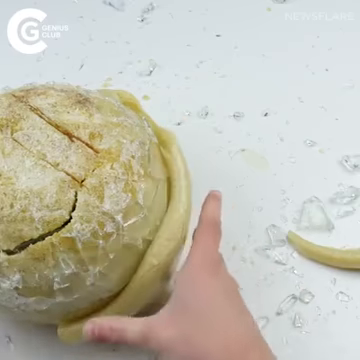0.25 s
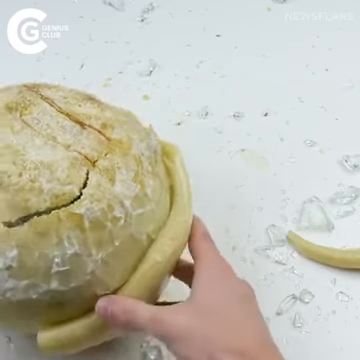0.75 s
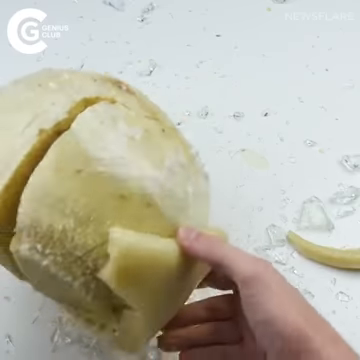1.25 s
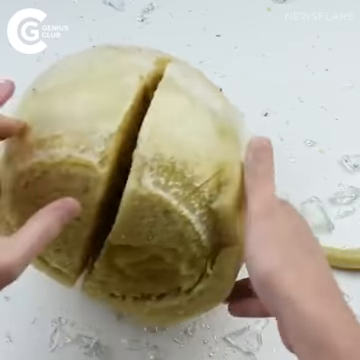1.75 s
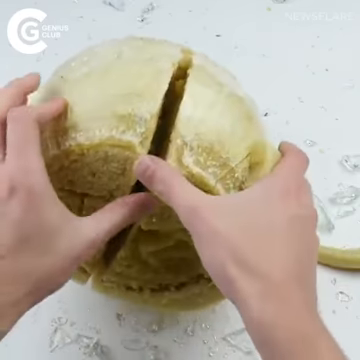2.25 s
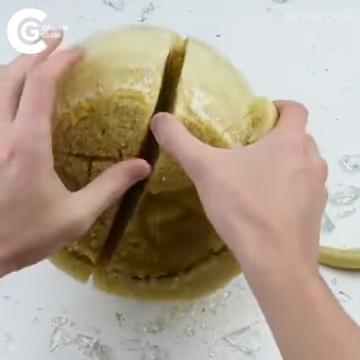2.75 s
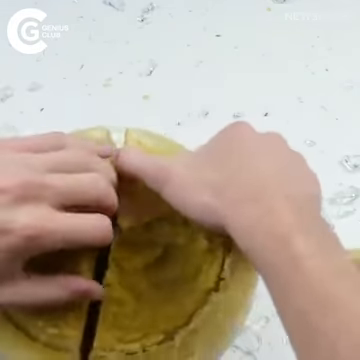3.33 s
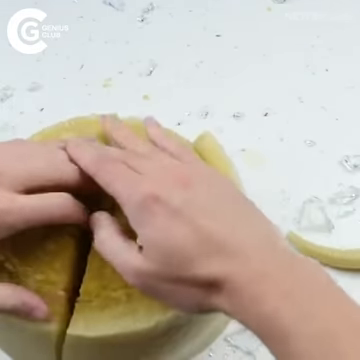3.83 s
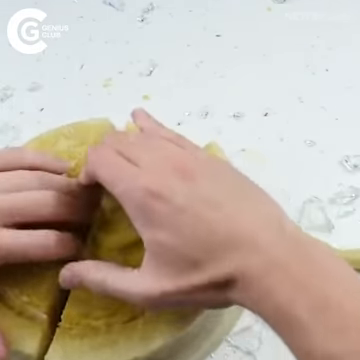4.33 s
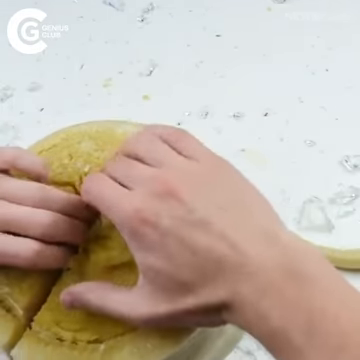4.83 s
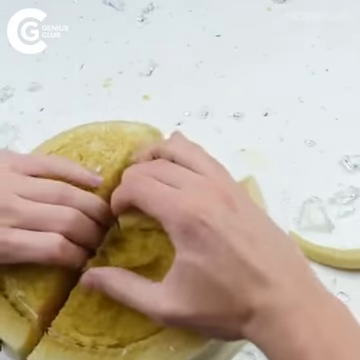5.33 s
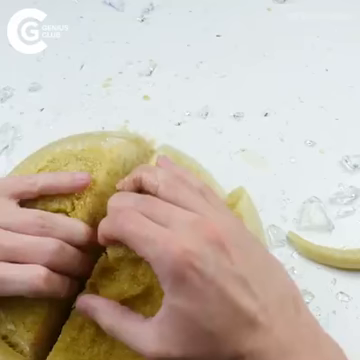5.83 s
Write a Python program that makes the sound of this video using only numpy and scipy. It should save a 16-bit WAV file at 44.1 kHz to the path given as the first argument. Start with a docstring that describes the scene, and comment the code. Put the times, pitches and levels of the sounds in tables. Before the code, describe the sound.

Hollow knocks and a bright glass clink as a hard foam block is turned on a table, then dry crackling, scraping and sharp snaps.

```python
"""A hollow knock and a clink of glass: two hands turn a split block of hardened foam on a glass-strewn table.
It knocks and drags, then they prise at the cut: the crust grinds, crackles and snaps.
Blows and random slips excite resonances of cavity, shell and crust; glass is decaying sines.
The table top booms, noise tails make a small live room, and shaped noise a faint ventilation hum."""
import sys
import numpy as np
from scipy import signal
from scipy.io import wavfile

SR = 44100
rng = np.random.default_rng(int(sys.argv[2]) if len(sys.argv) > 2 else 0)


def bounce(signal):
    """Save signal as a 16-bit WAV file at the path given by the first command-line argument."""
    frames = np.transpose(np.atleast_2d(signal))
    limited = np.clip(frames, -1, 1)
    pcm = np.round(limited * 32767).astype(np.int16)
    wavfile.write(sys.argv[1], SR, pcm)


N = 268128

# Table levels are relative; the playing functions add gains. width_hz is per resonator pass.


def from_db(db):
    """Amplitude ratio of a level in dB."""
    return 10 ** (np.asarray(db) / 20)


def sides_db(left_right_db):
    """Split a left-right level difference evenly over the two sides."""
    return np.array([[left_right_db / 2], [-left_right_db / 2]])


def rms_one(x):
    """Scale to an RMS of 1."""
    return x / np.sqrt(np.mean(x ** 2) + 1e-20)


def unit_energy(x):
    """Scale to a summed energy of 1."""
    return x / np.sqrt(np.sum(x ** 2) + 1e-20)


def at_hz(points, hz):
    """Read a (hz, value) curve on a log frequency axis."""
    curve = np.array(points)
    return np.interp(np.log(hz), np.log(curve[:, 0]), curve[:, 1])


def add(out, start_s, sound):
    """Mix a sound in from start_s on."""
    i = int(np.clip(round(start_s * SR), 0, N - 1))
    out[..., i:i + sound.shape[-1]] += sound[..., :N - i]


def drift(size, rate_hz):
    """A random wander of spread 1."""
    steps = rng.standard_normal(4096)
    return rms_one(np.interp(np.arange(size) / SR * rate_hz, np.arange(len(steps)), steps))


def resonate(x, hz, width_hz):
    """Two-pole resonance with gain 1 on top."""
    r = np.exp(-np.pi * width_hz / SR)
    zeros = np.array([1, 0, -1]) * (1 - r * r) / 2
    poles = [1, -2 * r * np.cos(2 * np.pi * hz / SR), r * r]
    return signal.lfilter(zeros, poles, x + 1e-18)


def resonate_twice(x, hz, width_hz):
    """Two equal resonances in series: rings swell before they decay."""
    return resonate(resonate(x, hz, width_hz), hz, width_hz)


def glide(x, hz, width_hz):
    """A resonance whose centre moves: shift down to 0 Hz, low-pass, shift back."""
    turn = np.exp(2j * np.pi * np.cumsum(hz) / SR)
    r = np.exp(-np.pi * width_hz / SR)
    return 2 * np.real(turn * signal.lfilter([(1 - r) ** 2], [1, -2 * r, r * r], x / turn + 1e-18))


def response(modes, size, order=2):
    """A part's ring after one click; at order 2 each mode swells over a few cycles."""
    out = np.zeros(size)
    for k, (hz, width_hz, db) in enumerate(modes):
        ring = signal.unit_impulse(size)
        for _ in range(order):
            ring = resonate(ring, hz, width_hz)
        out += (-1) ** k * from_db(db) * ring
    return unit_energy(out)


def tilted(modes, db_per_octave, pivot_hz):
    """Modes re-levelled along a slope that is 0 dB at pivot_hz."""
    return [(hz, width_hz, db + db_per_octave * np.log2(hz / pivot_hz)) for hz, width_hz, db in modes]


def grains(shape, per_s, spread_db):
    """Cell walls break at random moments, most of them tiny and a few large."""
    sizes = from_db(spread_db * np.minimum(rng.exponential(1, shape), 4))
    return sizes * rng.choice([-1, 1], shape) * (rng.random(shape) < per_s / SR)


def stereo_grains(size, per_s, spread_db, width):
    """Fractures scattered over the block reach the two sides partly alike and partly different."""
    mid, side = grains((2, size), per_s, spread_db)
    return rms_one(rms_one(mid) + width * rms_one(side) * [[1], [-1]])


# left-right correlation of diffuse sound: hz, correlation_0_to_1
LIKENESS_CURVE = [(200, 0.98), (600, 0.42), (1100, 0.5), (2500, 0.76), (8000, 0.7)]


def noise_bands(size):
    """Yield (hz, half-octave band) of stereo noise with frequency-dependent left-right likeness."""
    edges_hz = 22 * 2 ** np.arange(0, 9.1, .5)
    white = rng.standard_normal((2, 2, size))
    for k, (low_hz, high_hz) in enumerate(zip(edges_hz, edges_hz[1:])):
        band_pass = signal.butter(2, [low_hz, high_hz], "band", fs=SR, output="sos")
        mid, side = signal.sosfilt(band_pass, white[k % 2])  # neighbours use different noise
        hz = np.sqrt(low_hz * high_hz)
        alike = np.clip(at_hz(LIKENESS_CURVE, hz), 0, 1)
        yield hz, np.sqrt(1 + alike) * mid + np.sqrt(1 - alike) * side * [[1], [-1]]


MONO_BELOW_HZ = 870


def narrow(x):
    """Keep the bass centred: high-pass the side signal."""
    mid, side = (x[0] + x[1]) / 2, (x[0] - x[1]) / 2
    high_pass = signal.butter(8, MONO_BELOW_HZ, "high", fs=SR, output="sos")
    return mid + signal.sosfilt(high_pass, side) * np.array([[1], [-1]])


# ventilation spectrum: hz, density_db (per Hz)
AIR_SPECTRUM = [(25, -29.5), (45, -18), (62, -6.5), (90, -12.5), (130, 0), (200, -4), (290, 0), (420, -3.5),
                (800, -8), (1600, -15.5), (3200, -44), (8000, -46.5)]
RUSH_DB, HUM_HZ, HUM_DB = -52.5, 204, -54.5


def ventilation(wander_hz):
    """A low rush of air with a wavering hum; level of the lowest bands drifts."""
    wander_db = 2.5 * drift(N, wander_hz)
    rush = sum(band * from_db(at_hz(AIR_SPECTRUM, hz) + wander_db * (hz < 85))
               for hz, band in noise_bands(N))
    hum = rms_one(resonate_twice(rng.standard_normal(N), HUM_HZ, 30))
    return from_db(RUSH_DB) * narrow(rms_one(rush)) + from_db(HUM_DB) * hum


STROKE_SAG_DB_PER_S, STROKE_RELEASE_S = 19.5, 0.0076


def stroke(length_s, swell_share):
    """A stroke swells over a share of its length, slackens slowly and lets go."""
    t = np.arange(int((length_s + .2) * SR)) / SR
    rise = np.minimum(t / max(swell_share * length_s, 1 / SR), 1)
    release = np.exp(-np.maximum(t - length_s, 0) / STROKE_RELEASE_S)
    return rise * from_db(-STROKE_SAG_DB_PER_S * t) * release


# light rubbing of the palms: time_s, level_db
PALM_GRIP = [(0, -64.5), (0.32, -63), (0.48, -72.5), (0.8, -55), (1.42, -59), (1.749, -54), (2.101, -59.5),
             (2.28, -69), (2.719, -51.5), (3.0, -69), (3.28, -59), (3.569, -48), (3.88, -54), (4.33, -47),
             (4.8, -60.5), (5.33, -51.5), (5.5, -63.5), (6.08, -48)]
GRIP_CAVITY_DB, GRIP_CRUST_DB = -4.5, -4.5  # re shell
# block dragged or rolled on the table: start_s, length_s, swell_share, cavity_db, shell_db, crust_db
BLOCK_DRAGS = [(0, 0.044, 0, -38, -60.5, -65.5), (0.039, 0.16, 0.25, -33, -37, -43),
               (0.207, 0.15, 0.11, -36, -49, -67), (0.594, 0.18, 0.34, -43, -40.5, -46),
               (0.772, 0.057, 0.5, -37.5, -34, -40), (0.944, 0.14, 0.11, -35.5, -36, -45),
               (1.057, 0.11, 0.5, -36, -37.5, -42.5), (1.171, 0.061, 0.17, -39, -41, -45.5),
               (1.256, 0.1, 0.4, -49.5, -56, -59), (1.532, 0.04, 0.2, -48, -51, -51.5),
               (1.898, 0.01, 0, -38, -41, -47.5), (2.765, 0.105, 0.15, -38.5, -57.5, -69),
               (3.313, 0.06, 0.15, -35.5, -40, -45), (3.676, 0.087, 0.55, -40, -42.5, -44),
               (3.762, 0.026, 0.3, -43.5, -40.5, -44.5), (4.343, 0.099, 0.5, -43, -45, -47.5),
               (4.499, 0.18, 0.01, -43.5, -46.5, -52.5), (4.568, 0.095, 0.13, -39, -40.5, -47.5),
               (5.098, 0.023, 0.37, -42, -40, -46)]
# fingers slide over the crust: start_s, length_s, level_db, brightness_db (crust re shell)
FINGER_SLIDES = [(0.637, 0.084, -56, 3), (0.828, 0.028, -46, -5), (1.322, 0.016, -42.5, -7.5),
                 (1.648, 0.073, -52.5, 7.5), (1.988, 0.063, -53.5, -1.5), (2.046, 0.057, -51.5, 2),
                 (2.514, 0.023, -48, -10.5), (2.755, 0.096, -46, 3.5), (3.099, 0.062, -55, -5),
                 (3.346, 0.13, -50.5, 8), (3.561, 0.085, -61, 15), (3.996, 0.026, -45.5, -2),
                 (4.179, 0.046, -42.5, -0.5), (4.691, 0.042, -56.5, 3.5), (4.818, 0.042, -51, 2),
                 (4.876, 0.09, -47, 1), (4.973, 0.059, -52.5, -2), (5.206, 0.013, -47.5, -1),
                 (5.28, 0.018, -40, -6.5), (5.507, 0.096, -52, -4.5), (5.656, 0.03, -49, 4.5),
                 (5.778, 0.026, -40.5, 5), (5.859, 0.049, -55, 12.5), (5.991, 0.013, -41.5, 10.5)]
SLIDE_CAVITY_DB, SLIDE_SWELL_SHARE = -7, 0.25  # fingers stir the cavity less


def friction():
    """Drive of cavity, shell and crust: powers of grip, drags and finger slides add up."""
    grip_db = np.interp(np.arange(N) / SR, *np.transpose(PALM_GRIP))
    power = from_db([grip_db + GRIP_CAVITY_DB, grip_db, grip_db + GRIP_CRUST_DB]) ** 2
    for start_s, length_s, swell_share, *parts_db in BLOCK_DRAGS:
        add(power, start_s, np.outer(from_db(parts_db), stroke(length_s, swell_share)) ** 2)
    for start_s, length_s, level_db, brightness_db in FINGER_SLIDES:
        push = from_db(level_db) * stroke(length_s, SLIDE_SWELL_SHARE)
        add(power, start_s, np.outer(from_db([SLIDE_CAVITY_DB, 0, brightness_db]), push) ** 2)
    return np.sqrt(power)


# cavity pitch as the block is rolled, laid flat and squeezed: time_s, pitch_hz
CAVITY_PITCH_PATH = [(0, 586), (0.23, 565), (2.0, 570), (2.79, 514), (2.845, 585), (2.89, 475), (3.31, 598),
                     (3.54, 694), (3.7, 608), (4.65, 632), (5.6, 673), (6, 815)]


def cavity_pitch_hz(time_s):
    """The hollow's pitch follows how the block lies and is held."""
    return np.interp(time_s, *np.transpose(CAVITY_PITCH_PATH))


# rubbed cavity modes: pitch_multiple, width_hz, level_db
RUBBED_CAVITY_MODES = [(0.76, 200, -5.5), (1.0, 140.7, -1.5), (1.35, 367, -13)]
# shell modes: hz, width_hz, level_db
SHELL_MODES = [(1055, 404, 9.9), (1477, 465, 9.5), (2144, 700, 7.1), (2820, 1260, 0.15)]
# crust modes: hz, width_hz, level_db
CRUST_MODES = [(4030, 4000, -1.7), (5830, 1960, -0.79), (7376, 1340, 1), (8380, 540, 0.077)]
RUB_TILT_DB_PER_OCTAVE_PER_DB, RUB_PIVOT_HZ = 1, 1690  # per dB of shell drive over cavity drive


def rubbing(force, cavity_db, shell_db, crust_db, wander_db, wander_hz, judder_db, judder_hz):
    """Random slips shake cavity, shell and crust; shell and crust modes waver in level."""
    stick_slip = rms_one(from_db(judder_db * drift(N, judder_hz)))
    pitch_hz = cavity_pitch_hz(np.arange(N) / SR)
    cavity = 0
    for multiple, width_hz, db in RUBBED_CAVITY_MODES:
        slips = stereo_grains(N, per_s=900, spread_db=2.5, width=0.03)
        cavity = cavity + from_db(db) * glide(slips, multiple * pitch_hz, width_hz)
    out = from_db(cavity_db) * force[0] * rms_one(cavity)
    shell_tilt = RUB_TILT_DB_PER_OCTAVE_PER_DB * 20 * np.log10(force[1] / force[0])
    parts = [(force[1], tilted(SHELL_MODES, shell_tilt, RUB_PIVOT_HZ), shell_db, (480, 3, 0.63)),
             (force[2], CRUST_MODES, crust_db, (600, 2.5, 0.57))]
    for push, modes, part_db, (per_s, spread_db, width) in parts:
        rings = 0
        for hz, width_hz, db in modes:
            slips = stereo_grains(N, per_s, spread_db, width)
            moving_level = from_db(db + wander_db * drift(N, wander_hz))  # touching point moves
            rings = rings + moving_level * resonate_twice(slips, hz, width_hz)
        out = out + from_db(part_db) * push * rms_one(rings)
    return out * stick_slip


# flakes of crust snap: start_s, pitch_hz, level_db, overtone_db, left_right_db
FLAKE_SNAPS = [(0.0405, 2820, -26.5, -12, 7), (0.293, 2030, -40, -7, 5), (0.768, 2900, -27, -4, 3),
               (1.25, 2410, -38, 7.5, -1), (3.311, 2290, -26, 9, 1), (3.538, 2250, -32, -5, -1),
               (5.109, 1960, -45.5, -8, -1), (5.294, 2270, -42, -14, -2), (5.633, 2160, -43, -13, 5),
               (5.753, 1420, -37.5, -13, -1), (5.754, 2030, -35.5, -7, 6), (5.943, 1970, -32, -15, 1),
               (5.945, 1980, -27, 14, -5), (5.97, 2030, -19.5, -7.5, 9.5), (5.994, 2130, -31, 10, -6)]
OVERTONE_RATIO, OVERTONE_WIDTH_HZ, FLAKE_WIDTH_SHARE = 3.47, 520, 0.38  # share of pitch_hz


def snaps(snap_db):
    """One clean break sets each flake's two modes ringing."""
    out = np.zeros((2, N))
    for start_s, pitch_hz, level_db, overtone_db, left_right_db in FLAKE_SNAPS:
        modes = [(pitch_hz, FLAKE_WIDTH_SHARE * pitch_hz, 0),
                 (OVERTONE_RATIO * pitch_hz, OVERTONE_WIDTH_HZ, overtone_db)]
        gain = from_db(snap_db + level_db + sides_db(left_right_db))
        add(out, start_s, gain * response(modes, size=2048))
    return out


# block rocks and knocks: start_s, level_db, crunch_db (shell re cavity),
# brightness_db (crust re shell), left_right_db
BLOCK_KNOCKS = [(0.041, -18.5, -4.5, -0.5, 4), (0.062, -8.5, -20.5, -1, 16.5),
                (0.153, -19, -12.5, -13, -0.5), (0.168, -21.5, -10, -22, 0), (0.234, -16, -23, -14, 0),
                (0.27, -28.5, -31, -12, -1), (0.294, -22.5, -8, -16.5, 1.5), (0.767, -29, -3, 7.5, -0.5),
                (1.013, -35.5, -4, -9, -1), (1.025, -34.5, -8, -8, 0), (1.051, -31, -11, -8, -1),
                (1.127, -30.5, -6, -14, -1), (1.146, -31, -7, -4, 0), (1.247, -30, -4.5, 3.5, 3),
                (1.518, -36, -1.5, -0.5, -1), (1.608, -33.5, 0, -8.5, -1), (1.891, -35.5, -4, -10, 0),
                (2.884, -38, -33, -11, 0), (3.306, -35, 0, -17, -2), (3.309, -21.5, -5, 7.5, 0),
                (3.333, -35.5, 1, -13, 2.5), (3.537, -29, 0.5, 3.5, -0.5), (3.548, -37, 4.5, 0.5, 1),
                (3.701, -28, -2.5, -12, 0), (3.753, -32, -3, 2, -0.5), (4.503, -43, 1.5, -2.5, -1),
                (4.693, -41.5, -10, -15, 0)]
# crust cracks under the fingers: start_s, level_db, brightness_db (crust re shell), left_right_db
CRUST_CRACKS = [(0.776, -45, 19, 4), (0.941, -29.5, -17, -0.5), (0.964, -28.5, -8, 2), (1.06, -36, -0.5, 1),
                (1.601, -34, -14, 1.5), (1.665, -39, -1.5, 2), (2.155, -51, 1, -3), (2.393, -46.5, 1, 1),
                (2.599, -46, 6.5, 2), (2.69, -48, 4.5, 1), (2.755, -38.5, -2.5, 0), (3.053, -70.5, 18, -2),
                (3.509, -36.5, -5, 2), (4.213, -40, -12, -1), (4.396, -47, -7, 0), (4.423, -37.5, -1, 1),
                (4.636, -36.5, -5, 1), (4.823, -46.5, -6, 3), (4.883, -42.5, -12, 1), (4.917, -46, -6, 2),
                (4.939, -51, 13.5, 2), (5.108, -40, -7, -4), (5.201, -40.5, -0.5, -2), (5.29, -39, -5, 0),
                (5.633, -39, -4, -2), (5.676, -42, -1, -4), (5.752, -31.5, -7, 0), (5.785, -41, -5, 0),
                (5.942, -29, -1.5, 0), (5.968, -27, -0.5, -3), (5.975, -26.5, -4.5, 6),
                (5.994, -39, -1, -8)]
CRACK_CAVITY_DB = -10  # a crack hardly stirs the cavity
CRUMBS_PER_S, CRUMB_DB, CRUMB_SPREAD_DB = 9, -5.5, 2.5  # levels re rubbing


def blows(force):
    """List knocks, cracks and random crumbs: start_s, cavity_db, shell_db, crust_db, left_right_db."""
    knocks = [(start_s, db, db + crunch_db, db + crunch_db + brightness_db, left_right_db)
              for start_s, db, crunch_db, brightness_db, left_right_db in BLOCK_KNOCKS]
    cracks = [(start_s, db + CRACK_CAVITY_DB, db, db + brightness_db, left_right_db)
              for start_s, db, brightness_db, left_right_db in CRUST_CRACKS]
    crumbs = []
    for k, (when, size) in enumerate(rng.random((64, 2))):  # one per equal time slot
        start_s = (k + when) / CRUMBS_PER_S
        if start_s * SR < N:
            rub_db = 20 * np.log10(force[:, int(start_s * SR)])
            crumbs.append((start_s, *(rub_db + CRUMB_DB + CRUMB_SPREAD_DB * (2 * size - 1)), 0))
    return knocks + cracks + crumbs


# struck cavity modes: pitch_multiple, width_hz, level_db
STRUCK_CAVITY_MODES = [(0.479, 37.3, -5.5), (0.737, 148, -2), (1.001, 179, 2), (1.55, 320, -11.5)]
CRUST_TILT_DB_PER_OCTAVE, CRUST_TILT_PER_BRIGHT_DB = 5.5, 0.97  # brighter: highest modes gain
SHELL_TILT_PER_CRUNCH_DB = 0.34  # dB per octave: dull knocks ring low modes, cracks high ones


def contacts(rows, cavity_gain_db, shell_gain_db, crust_gain_db, cavity_crumble, shell_crumble,
             crust_crumble, crumble_s, width, mode_spread_db, cavity_pan_share):
    """Each contact is one blow and a short run of small fractures; crust rings mostly with the fractures."""
    size = SR // 8
    t, out = np.arange(size) / SR, np.zeros((2, N))
    for start_s, cavity_db, shell_db, crust_db, left_right_db in rows:
        pitch_hz = cavity_pitch_hz(start_s)
        cavity = response([(k * pitch_hz, w, db) for k, w, db in STRUCK_CAVITY_MODES], size)
        shell_tilt = SHELL_TILT_PER_CRUNCH_DB * (shell_db - cavity_db)
        shell_modes = [(hz, w, db + mode_spread_db * rng.normal())
                       for hz, w, db in tilted(SHELL_MODES, shell_tilt, SHELL_MODES[0][0])]
        shell = response(shell_modes, size)
        crust_tilt = CRUST_TILT_DB_PER_OCTAVE + CRUST_TILT_PER_BRIGHT_DB * (crust_db - shell_db)
        crust = response(tilted(CRUST_MODES, crust_tilt, CRUST_MODES[0][0]), size)
        dying = np.exp(-t / crumble_s) * (t + 0.00011)
        run = unit_energy(stereo_grains(size, per_s=5000, spread_db=2.0, width=width) * dying)
        pan_db = sides_db(left_right_db)
        parts = [  # the cavity radiates as one: same run on both sides
            (cavity, cavity_db + cavity_gain_db + cavity_pan_share * pan_db, cavity_crumble * run[[0, 0]]),
            (shell, shell_db + shell_gain_db + pan_db, shell_crumble * run),
            (crust, crust_db + crust_gain_db + pan_db, crust_crumble * run)]
        for ring, db, breaks in parts:
            crumbling = signal.fftconvolve(breaks, ring[None])[:, :size]
            add(out, start_s, from_db(db) * unit_energy(ring + crumbling))
    return out


# jolts of a glass shard: start_s, level_db
GLASS_JOLTS = [(0.045, -18), (0.071, -40), (0.079, -16.5), (0.186, -58), (0.213, -59)]
# shard modes: hz, level_db, t60_s
GLASS_MODES = [(3240, -14, 0.042), (6150, -12.5, 0.061), (8450, -11.5, 0.039)]


def shard(left_right_db):
    """Every jolt rings the modes of the glass with strengths of its own."""
    t, out = np.arange(SR // 2) / SR, np.zeros(N)
    for start_s, level_db in GLASS_JOLTS:
        for hz, mode_db, t60_s in GLASS_MODES:
            decay_db = level_db + mode_db + rng.normal(0, 0.63) - 60 * t / t60_s
            add(out, start_s, from_db(decay_db) * np.sin(2 * np.pi * hz * t))
    return out * from_db(sides_db(left_right_db))


# table modes: hz, width_hz, level_db
TABLE_MODES = [(58, 9, -32), (129, 3.6, 11), (197, 54, -9), (260.4, 25, -6)]
# block's whole weight drops on the table: start_s, thud_db, slap_db, boom_db
BLOCK_LANDINGS = [(0.254, -35, -48.5, -57), (0.769, -49, -61, -38.5), (1.247, -61, -46, -48),
                  (1.518, -63, -48, -44.5), (1.609, -38, -43.5, -44), (2.8, -64, -65, -42),
                  (3.307, -27, -34.5, -29), (3.704, -31.5, -63, -28.5), (5.97, -34, -36, -40.5)]
# boom starts flat under the load, then rises to its own pitch
BOOM_HZ, BOOM_SAG_HZ, BOOM_SETTLE_S, BOOM_SWELL_S = 134.5, 10.5, 0.12, 0.026


def table(force, knock_db, drag_db, lag_s):
    """The table rings just after each knock, booms under landings and murmurs with the rubbing."""
    pushes, booms, t = np.zeros(N), np.zeros(N), np.arange(SR // 2) / SR
    for start_s, level_db, *_ in BLOCK_KNOCKS:
        add(pushes, start_s + lag_s, from_db([level_db + knock_db]))
    hz = BOOM_HZ - BOOM_SAG_HZ * np.exp(-t / BOOM_SETTLE_S)
    swell = t / BOOM_SWELL_S * np.exp(1 - t / BOOM_SWELL_S)
    boom = swell * np.sin(2 * np.pi * np.cumsum(hz) / SR)
    for start_s, _, _, boom_db in BLOCK_LANDINGS:
        add(booms, start_s, from_db(boom_db) * boom)
    drag = from_db(drag_db) * force * rng.standard_normal(N)
    ringing = signal.oaconvolve(pushes, response(TABLE_MODES, size=SR, order=1))
    murmur = signal.oaconvolve(drag, response(TABLE_MODES[1:], size=SR, order=1))
    return booms + (ringing + murmur)[:N]


# thud modes: hz, width_hz, level_db
THUD_MODES = [(32, 24, -11), (56, 24, -4), (85, 234, -3.5)]
# modes of flat faces slapping together: hz, width_hz, level_db
SLAP_MODES = [(810, 350, 12.4), (1144, 230, 1.1), (1546, 110, 9.5)]


def landings(thud_gain_db, slap_gain_db):
    """Each landing gives a woody slap and a deep thud of the table legs."""
    out = np.zeros(N)
    thud, slap = response(THUD_MODES, size=16384), response(SLAP_MODES, size=16384)
    for start_s, thud_db, slap_db, _ in BLOCK_LANDINGS:
        add(out, start_s, from_db(thud_gain_db + thud_db) * thud + from_db(slap_gain_db + slap_db) * slap)
    return out


# crust edges grind on each other: start_s, length_s, level_db, pitch_hz
EDGE_GRINDS = [(0.629, 0.17, -48, 2700), (0.941, 0.039, -44, 2860), (1.039, 0.2, -49, 3130),
               (1.326, 0.022, -50, 2260), (1.906, 0.015, -53, 2550), (3.672, 0.062, -44, 2500),
               (3.971, 0.29, -56, 2350), (4.189, 0.04, -49, 2980), (4.486, 0.17, -49.5, 3100),
               (4.878, 0.062, -41.5, 2630), (5.287, 0.017, -52, 2400)]


def grinding(slips_per_s, spread_db, width_hz, swell_share):
    """Two edges catch and slip unevenly, each pair ringing at a pitch of its own."""
    out = np.zeros((2, N))
    for start_s, length_s, level_db, pitch_hz in EDGE_GRINDS:
        push = stroke(length_s, swell_share)
        slips = stereo_grains(len(push), slips_per_s, spread_db, width=0.59)
        add(out, start_s, from_db(level_db) * push * rms_one(resonate_twice(slips, pitch_hz, width_hz)))
    return out


# reflection colour: hz, level_db
REFLECTION_COLOUR = [(150, -2), (580, -3), (800, -1), (1100, 4.5), (2500, 1.5), (5000, 6), (8000, -3.5)]
# room decay: hz, t60_s
ROOM_DECAY = [(100, 0.7), (500, 0.42), (1500, 0.3), (4000, 0.22), (8000, 0.22)]


def room(hits, rub, rub_send_db, early_db, early_s, late_db, build_s):
    """Blows bounce off table and hands; blows and rubbing leave a diffuse tail, shorter in the treble."""
    t = np.arange(SR * 3 // 4) / SR
    early = sum(band * from_db(at_hz(REFLECTION_COLOUR, hz)) for hz, band in noise_bands(len(t)))
    early = early * np.exp(-t / early_s) * (t > .001)
    late = sum(band * from_db(at_hz(REFLECTION_COLOUR, hz) - 60 * t / at_hz(ROOM_DECAY, hz))
               for hz, band in noise_bands(len(t)))
    late = late * (1 - np.exp(-t / build_s))
    bounces = signal.oaconvolve(hits, from_db(early_db) * unit_energy(early), axes=1)
    sent = hits + from_db(rub_send_db) * rub
    tail = signal.oaconvolve(sent, from_db(late_db) * unit_energy(late), axes=1)
    return hits + rub + narrow((bounces + tail)[:, :N])


def scene():
    """Blows, rubbing and glass sound in the room, over the table's boom and the ventilation."""
    force = friction()
    rub = rubbing(force, cavity_db=0.5, shell_db=0.07, crust_db=1.0, wander_db=2.5, wander_hz=45.18,
                  judder_db=2, judder_hz=217.6)
    rub = rub + grinding(slips_per_s=550, spread_db=1.5, width_hz=990, swell_share=0.075)
    boom = table(force[0], knock_db=6.5, drag_db=-7.0, lag_s=0.0057)
    air = ventilation(wander_hz=8)
    hits = contacts(blows(force), cavity_gain_db=30.0, shell_gain_db=27.0, crust_gain_db=26.5,
                    cavity_crumble=0.12, shell_crumble=3.6, crust_crumble=8.1, crumble_s=0.0023,
                    width=0.63, mode_spread_db=4.5, cavity_pan_share=0.31)
    near = hits + snaps(snap_db=24) + landings(thud_gain_db=20.0, slap_gain_db=37)
    near = near + shard(left_right_db=-3.0)
    block = room(near, narrow(rub), rub_send_db=-1.0, early_db=-2.5, early_s=0.011,
                 late_db=-2.5, build_s=0.0017)
    return block + boom + air


DIP_HZ, DIP_WIDTH_HZ, DIP_DEPTH = 3586, 206, 0.59  # depth: share of amplitude removed
CUTOFF_HZ = 8660


def record(dry):
    """A narrow treble dip, hard clipping at full scale, then a steep low-pass."""
    dipped = dry - DIP_DEPTH * resonate(dry, DIP_HZ, DIP_WIDTH_HZ)
    low_pass = signal.ellip(12, .1, 75, CUTOFF_HZ, fs=SR, output="sos")
    return signal.sosfilt(low_pass, np.clip(dipped, -1, 1))


dry = scene()
out = record(dry)
bounce(out)
```